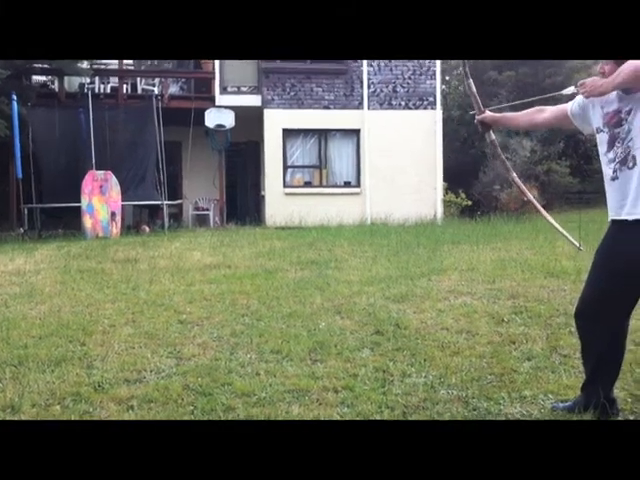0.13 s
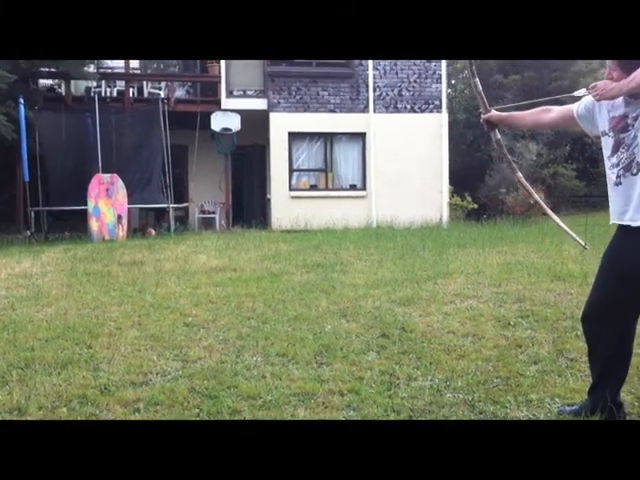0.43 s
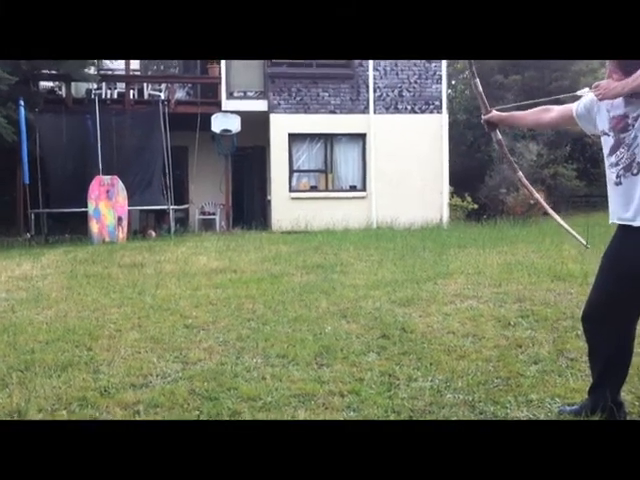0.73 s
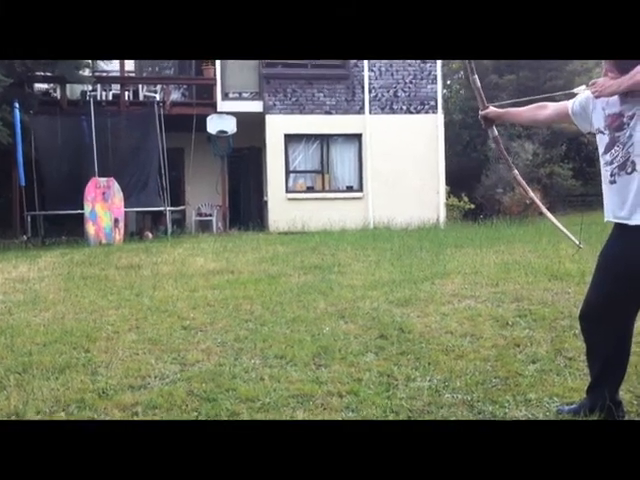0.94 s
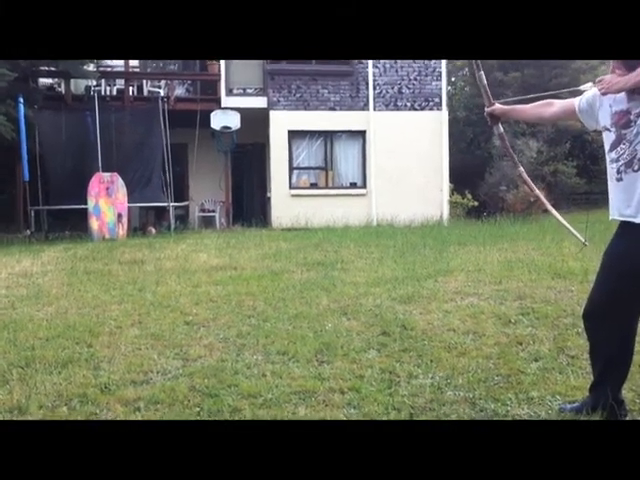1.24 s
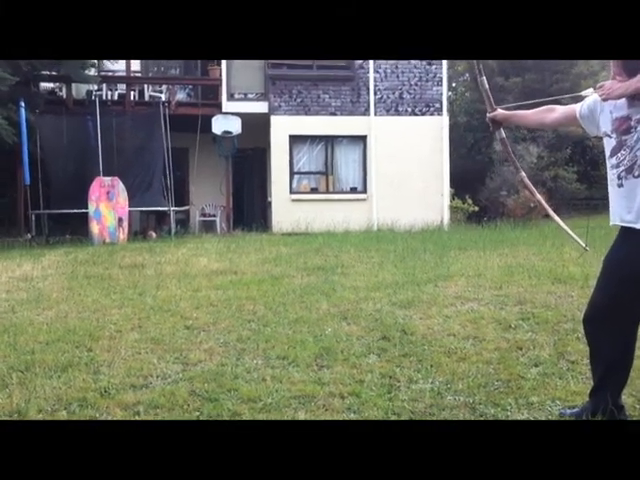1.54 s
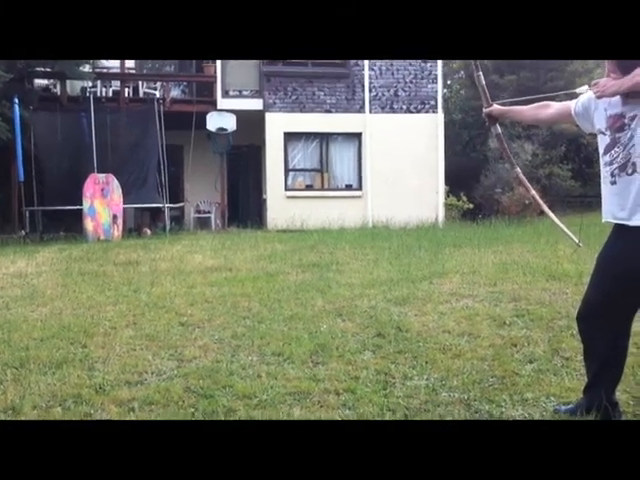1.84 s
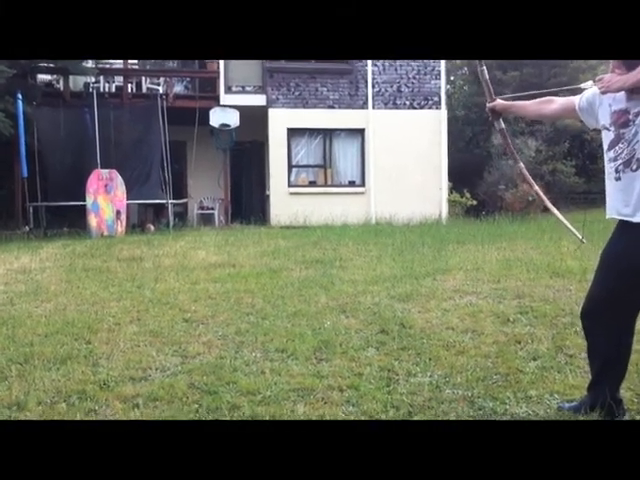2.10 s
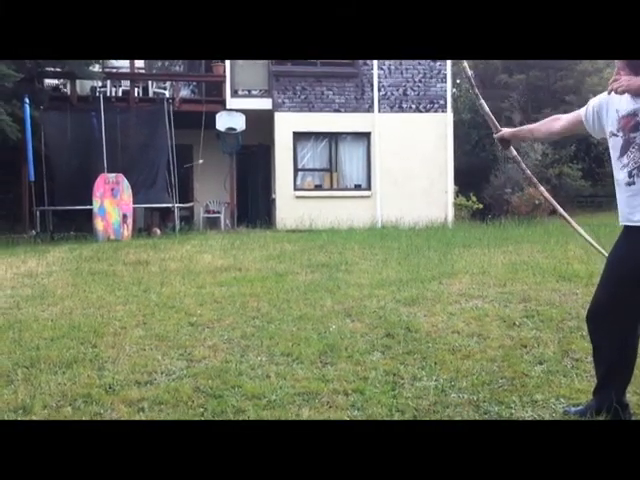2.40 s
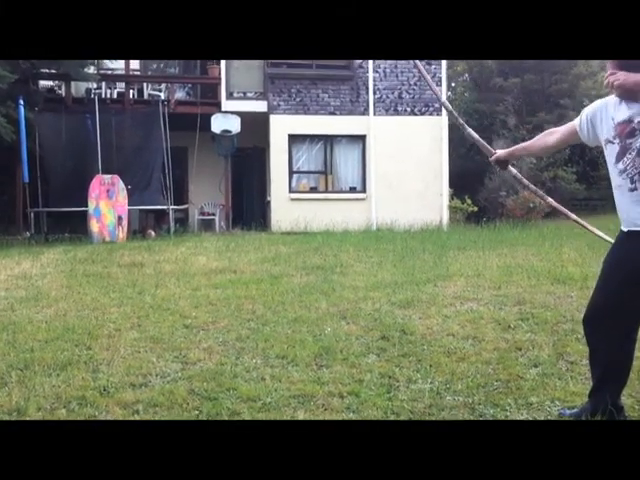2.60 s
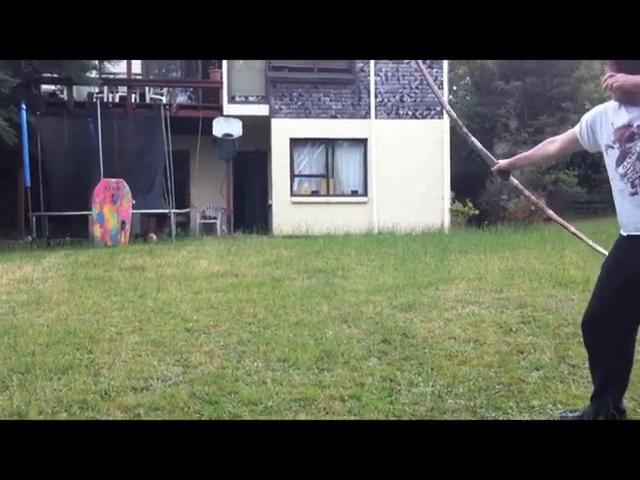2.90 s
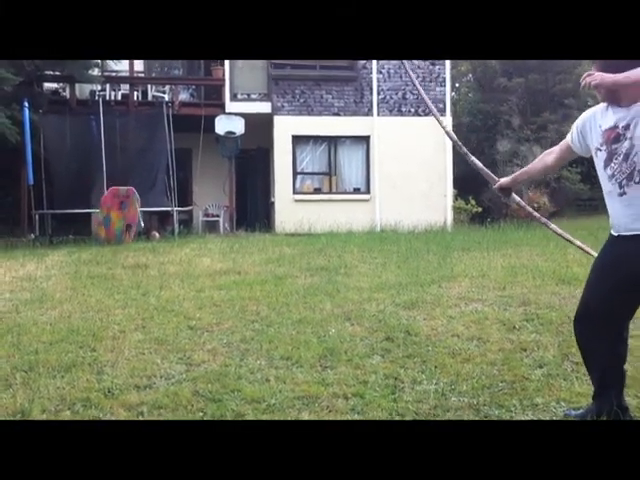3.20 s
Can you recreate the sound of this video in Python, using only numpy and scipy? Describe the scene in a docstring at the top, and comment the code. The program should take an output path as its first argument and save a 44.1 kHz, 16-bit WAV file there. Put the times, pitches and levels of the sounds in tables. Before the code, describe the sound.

A bow shot in a grassy backyard. For the first 2.3 s only small birds chirp and twitter near and far over faint distant traffic, breeze and hiss. At 2.3 s the wooden bow snaps and the arrow clatters dryly past it; at 2.62 s it hits a standing shield with a crack, hollow thump and tiny rattle. Walls scatter brief echoes; light wind and chirps continue to 3.35 s.

```python
"""Small birds chirp near and far over distant traffic, wind in trees and hiss, all shaped or banded noise;
the birds are gliding sines, partly scattered by the trees. A wooden longbow is then loosed on a lawn: the
arrow clatters past the stave as rasps and decaying modes, then thumps into a standing shield some ten metres
off, with cracks, ringing face modes and a brief panel boom. House walls and a fence scatter both back."""
import sys
import numpy as np
from scipy import signal
from scipy.fft import rfft, irfft
from scipy.io import wavfile
from scipy.ndimage import uniform_filter1d

SR = 44100
rng = np.random.default_rng(int(sys.argv[2]) if len(sys.argv) > 2 else 0)


def unload_wav(signal):
    """Save mono or channel-first audio to the path in sys.argv[1] as 16-bit WAV at rate SR, clipped to [-1, 1]."""
    wavfile.write(
        sys.argv[1],
        SR,
        np.round(np.clip(np.atleast_2d(signal).T, -1, 1) * 32767).astype(np.int16),
    )


def ratio(d):
    """dB to gain"""
    e = np.asarray(d, float) / 20
    return 10 ** e


N = 147735  # samples


def add(out, start_s, sound):
    """Superposition: pressures sum, here from start_s on."""
    i = int(start_s * SR)
    out[i:i + len(sound)] += sound[:N - i]


def band(x, center_hz, octaves):
    """Band-pass filtering: a Gaussian weight on a log-frequency axis."""
    f = np.fft.rfftfreq(len(x), 1 / SR) + 1
    weight = np.exp(-.5 * (np.log2(f / center_hz) / octaves) ** 2)
    return irfft(rfft(x) * weight, len(x))


def walk(rate_hz):
    """Random modulation: held random values, smoothed twice, with a spread near 1."""
    hold = int(SR / rate_hz)
    steps = np.repeat(rng.standard_normal(N // hold + 1), hold)
    return 1.3 * uniform_filter1d(uniform_filter1d(steps, hold), hold)[:N]


def contour(table):
    """Amplitude envelope: the table's level in dB, interpolated over time."""
    return np.interp(np.arange(N) / SR, *np.array(table).T)


def decay(t, t60_s):
    """Exponential damping: a fall of 60 dB in t60_s."""
    return np.exp(-np.log(1000) * t / t60_s)


def convolve(x, response):
    """Linear response: x heard through an impulse response."""
    return signal.fftconvolve(x, response)[:N]


# spectrum of traffic, leaves and hiss; only its shape counts, the sum is levelled afterwards
# columns: frequency_hz, relative_level_db (per Hz)
AIR_SPECTRUM = [(20, -22), (50, -16), (90, -10.5), (140, -1), (190, -0.5), (300, -1.5), (490, -4),
                (680, -9), (1100, -8.5), (1500, -13), (2200, -14.5), (2900, -19), (6000, -22.5),
                (11000, -25.5), (15700, -23), (16300, -59)]


def air():
    """Broadband noise: shaped noise in bands that swell together and flicker alone, steadier in the treble."""
    level_db, gust_db, flicker_db = -58, .4, 0.7  # the last two shrink above 1500 Hz
    f = np.fft.rfftfreq(N, 1 / SR) + 1
    hz, db = np.array(AIR_SPECTRUM).T
    spectrum = ratio(np.interp(np.log(f), np.log(hz), db))
    noise = irfft(rfft(rng.standard_normal(N)) * spectrum, N)
    gust = walk(1.66)
    out = np.zeros(N)
    for center_hz in 20 * 2 ** np.arange(0, 10.5, .5):
        depth = min(1, 1500 / center_hz) ** .5
        swing_db = depth * (gust_db * gust + flicker_db * walk(8.7))
        out += ratio(swing_db) * band(noise, center_hz, 0.9)
    return ratio(level_db) * out / out.std()


# wind buffeting the microphone, before its random wavering
# columns: time_s, level_db
BUFFET_LEVEL = [(0, -83), (2.5, -72), (2.7, -58), (2.95, -65), (3.08, -58.5), (3.2, -67), (3.35, -80)]


def buffet():
    """Turbulent pressure: a low band of noise whose level follows the wind and wavers."""
    wind = band(rng.standard_normal(N), 69.6, 1.0)
    wind_db = contour(BUFFET_LEVEL) + 1.2 * walk(14)
    return ratio(wind_db) * wind / wind.std()


# tyre roar of a car passing far off
# columns: time_s, level_db
CAR_LEVEL = [(0, -73), (1.4, -121), (1.6, -65), (2.1, -65), (2.6, -75), (3.35, -66)]


def car():
    """Rolling noise: a broad band of noise whose level falls and rises."""
    roar = band(rng.standard_normal(N), 1110, 0.57)
    return ratio(contour(CAR_LEVEL)) * roar / roar.std()


def chirp(length_s, start_hz, end_hz):
    """Frequency modulation: a sine of gliding pitch under a rounded envelope."""
    u = np.linspace(0, 1, max(int(length_s * SR), 8))
    pitch_hz = start_hz + (end_hz - start_hz) * u
    return np.sin(np.pi * u) ** 0.42 * np.sin(2 * np.pi * np.cumsum(pitch_hz) / SR)


# clear notes of near birds
# columns: start_s, length_s, start_hz, end_hz, level_db (direct sound)
NEAR_NOTES = [(.015, 0.022, 2840, 2850, -68), (.06, 0.035, 2850, 2870, -68), (.165, 0.011, 3800, 3750, -60),
              (0.172, 0.031, 4360, 4300, -66), (.195, 0.016, 3640, 3280, -61),
              (0.213, 0.021, 3890, 3490, -58.5), (0.209, 0.022, 2970, 2900, -70),
              (0.256, 0.032, 2000, 2040, -62.5), (0.265, .02, 2930, 2970, -66),
              (.31, .08, 2900, 2820, -65.5), (0.323, 0.045, 2000, 2000, -65),
              (0.348, 0.013, 3380, 3370, -59.5), (0.6, .07, 3910, 3900, -69.5),
              (0.68, 0.06, 4170, 3920, -59), (.715, 0.027, 5000, 3540, -56.5),
              (0.749, 0.022, 4300, 3860, -56.5), (1.08, 0.031, 4600, 4700, -67),
              (1.124, 0.009, 3400, 3600, -59), (1.138, .012, 3270, 3150, -61),
              (1.164, 0.034, 4600, 4600, -71), (1.172, 0.0088, 4000, 3700, -61.5),
              (1.229, 0.013, 3800, 2970, -60), (1.275, .014, 3070, 3050, -63),
              (1.733, 0.014, 3400, 4200, -61), (1.764, 0.016, 4155, 3350, -47.5),
              (1.797, .02, 3660, 3440, -52), (1.808, 0.023, 3280, 2900, -61), (1.759, .03, 4430, 4500, -66),
              (1.892, .025, 3640, 3320, -62), (2.281, 0.023, 4180, 3800, -58),
              (2.554, 0.026, 2600, 2600, -64.5), (2.58, 0.03, 4700, 4550, -65),
              (2.745, 0.024, 4130, 4210, -57), (2.766, 0.02, 4290, 3470, -51.5),
              (2.806, 0.0165, 3430, 4000, -51.5), (2.818, 0.0192, 3950, 3480, -54.5),
              (3.247, 0.0066, 4080, 3530, -58.5), (3.299, 0.0085, 3800, 3540, -57),
              (3.312, 0.013, 2800, 2780, -62)]
# fast twitter of farther birds
# columns: start_s, length_s, low_hz, high_hz, level_db (before the spread of the tweets and the path)
FAR_TWITTER = [(0.158, 0.086, 2676, 4300, -61.5), (0.296, 0.092, 2430, 5160, -63.5),
               (0.543, 0.21, 3510, 4500, -64), (0.707, 0.096, 3360, 5050, -57),
               (0.75, 0.07, 2720, 3260, -63), (1.081, 0.25, 2650, 4290, -68.5),
               (1.347, 0.17, 3310, 4490, -70.5), (1.545, 0.12, 1570, 2390, -67),
               (1.819, 0.1, 2970, 4560, -62), (1.971, 0.056, 4150, 4820, -57),
               (2.003, 0.12, 2600, 3800, -65.5), (2.83, 0.069, 2980, 4300, -65),
               (3.042, 0.062, 3255, 5030, -58), (3.149, .2, 2660, 4460, -69)]
# one far bird's falling whistle
# columns: start_s, length_s, start_hz, end_hz, level_db (before the path)
FAR_WHISTLE = [(.99, .09, 7450, 5600, -59)]


def birds():
    """Direct and scattered sound: near notes come mostly direct, far twitter and whistle mostly off the trees."""
    tweets_per_s, tweet_s, glide, spread_db = 600, 0.011, 0.16, 5  # glide: largest share of the pitch
    near_to_trees_db, far_direct_db, trees_t60_s = -7.5, -10, 0.43
    near, far = np.zeros(N), np.zeros(N)
    for start_s, length_s, start_hz, end_hz, db in NEAR_NOTES:
        add(near, start_s, ratio(db) * chirp(length_s, start_hz, end_hz))
    for start_s, length_s, start_hz, end_hz, db in FAR_WHISTLE:
        add(far, start_s, ratio(db) * chirp(length_s, start_hz, end_hz))
    for start_s, length_s, low_hz, high_hz, db in FAR_TWITTER:
        for place, height, bend, loudness in rng.random((int(length_s * tweets_per_s), 4)):
            hz = low_hz + (high_hz - low_hz) * height
            tweet = chirp(tweet_s, hz, hz * (1 + glide * (2 * bend - 1)))
            swell = np.sin(np.pi * place) ** .5  # tweets are loudest mid-swarm
            level = ratio(db + spread_db * (loudness - 1.5))
            add(far, start_s + length_s * place, level * swell * tweet)
    t = np.arange(SR // 3) / SR
    trees = rng.standard_normal(len(t)) * decay(t, trees_t60_s)
    trees = trees / np.sqrt(np.sum(trees ** 2))  # unit energy
    scattered = convolve(ratio(near_to_trees_db) * near + far, trees)
    return near + ratio(far_direct_db) * far + scattered


def ring(modes, length_s, contact_s, detune=0, flip=-1):
    """Modal superposition: decaying sines swell over the contact time; mode k is weighted by flip ** k."""
    t = np.arange(int(length_s * SR)) / SR
    tune = 1 + detune * rng.standard_normal(len(modes))
    out = np.zeros(len(t))
    for k, (hz, db, t60_s) in enumerate(modes):
        out += flip ** k * ratio(db) * np.sin(2 * np.pi * hz * tune[k] * t) * decay(t, t60_s)
    return (1 - np.exp(-t / contact_s)) * out


def burst(decay_s):
    """Impulsive noise: a short splinter of white noise that falls by 1/e in decay_s."""
    return rng.standard_normal(600) * np.exp(-np.arange(600) / SR / decay_s)


# scatter from house walls and fence, per band
# columns: center_hz, after_bow_db, after_shield_db (both relative to the impact), t60_s
YARD_SCATTER = [(149, -47, -33, 0.56), (326, -46, -22.5, 0.21), (950, -49, -39, 1),
                (1845, -31, -28.5, 0.49), (3800, -33, -41.5, 0.6), (6060, -34.5, -43, 0.39),
                (9800, -41.5, -43, 0.46), (15000, -50, -50, .25)]


def yard(column):
    """Diffuse reflection: makes lumpy noise echoes that swell after a gap, each band with its own decay."""
    delay_s, rise_s = 0.0013, 0.004
    t = np.arange(SR // 2) / SR
    rise = np.clip((t - delay_s) / rise_s, 0, 1)
    lumps = ratio(2.5 * walk(200)[:len(t)])  # dB, new values per second

    def echo():
        """Random scattering: a fresh noise under the same lumps."""
        noise = lumps * rng.standard_normal(len(t))
        out = np.zeros(len(t))
        for row in YARD_SCATTER:
            x = band(noise, row[0], 0.33)
            out += ratio(row[column]) * x / x.std() * decay(t, row[3])
        return rise * out
    return echo


# arrow knocking on string and stave
# columns: start_s, level_db, low_modes_db (relative to the high modes)
KNOCKS = [(2.3025, -44, 6), (2.3060, -21, -6), (2.3075, -41, 5), (2.3090, -34.5, -9), (2.3178, -20.5, 3),
          (2.3195, -32, -2), (2.3215, -28, 8), (2.3238, -23, -8.5), (2.3255, -22, -1), (2.3270, -25, 2.5),
          (2.3295, -35.5, 14), (2.3335, -32.5, 6.5), (2.3385, -49, 4), (2.387, -47, 10), (2.3990, -47, 10)]
# modes of shaft and stave, before random detuning and the swell of the contact
# columns: pitch_hz, level_db (relative to the knock), t60_s
SHAFT_MODES = [(295, -25, 0.032), (409, -22, 0.085), (874, -25.5, 0.06), (1120, -21.5, 0.053),
               (1717, -10, 0.021), (2076, -9.5, 0.04), (2600, -7.5, 0.016), (3150, -13, 0.056),
               (3700, 2.5, 0.019), (4300, 4, .01), (5580, -4, 0.012), (6300, -11.5, 0.017),
               (8200, -14.5, 0.0085), (9050, -13.5, 0.013), (12000, -14, 0.014), (13100, -27, .01)]


def bow():
    """Impact excitation: each knock rings slightly detuned modes, adds a rasp and wakes the yard."""
    split_hz, ring_s, contact_s, detune = 2900, .12, 0.00066, .025  # detune: spread as a share of pitch
    rasp_db, rasp_s = -10, 0.00073
    low = [mode for mode in SHAFT_MODES if mode[0] < split_hz]
    high = [mode for mode in SHAFT_MODES if mode[0] >= split_hz]
    out, echo = np.zeros(N), yard(column=1)
    for start_s, db, low_db in KNOCKS:
        high_ring = ring(high, ring_s, contact_s, detune)
        low_ring = ring(low, ring_s, contact_s, detune)
        add(out, start_s, ratio(db) * (high_ring + ratio(low_db) * low_ring))
        add(out, start_s, ratio(db + rasp_db) * burst(rasp_s))
        add(out, start_s, ratio(db) * echo())
    return out


# arrow in the shield, then the shield rattling on its prop
# columns: start_s, level_db
SHIELD_BLOWS = [(2.6205, -24), (2.62145, -15), (2.6240, -27), (2.6375, -31), (2.6420, -32), (2.6480, -32),
                (2.6565, -28), (2.6590, -32), (2.6630, -33), (2.6750, -31), (2.6810, -35), (2.6950, -37)]
# pushes that bend the whole panel
# columns: start_s, level_db
PANEL_PUSHES = [(2.6223, -20.5), (2.638, -47), (2.655, -34), (2.6750, -33)]
# face of the shield under the point, before the contact swell and the slight taper over the modes
# columns: pitch_hz, level_db (relative to the blow), t60_s
FACE_MODES = [(840, -11, .014), (940, -5, .016), (1150, -7, .012), (1550, 3, .009), (1950, 8, .007),
              (2800, -6, .014), (3740, -16, .01), (4600, -16, .01), (5600, -12, .007), (7300, -9, .005),
              (10200, -10, .005), (11600, -9, .005), (15000, -8, .005)]
# whole panel of the shield, before the contact swell and the taper over the modes
# columns: pitch_hz, level_db (relative to the push), t60_s
PANEL_MODES = [(117, -19, 0.11), (159.6, -4.5, .16), (195.3, 2.5, 0.069), (217, -3.5, 0.17),
               (270, 2, 0.081), (331.6, -4, 0.17), (358, -8, .1)]


def shield():
    """Plate vibration: blows ring the face, crack and wake the yard; slower pushes make the panel boom."""
    crack_db, crack_steep, crack_s = -4.5, 1.39, .0022  # steep: dB of crack per dB of blow
    face = ring(FACE_MODES, .06, .0008, flip=0.99)
    panel = ring(PANEL_MODES, .3, 0.0039, flip=0.93)
    out, echo = np.zeros(N), yard(column=2)
    for start_s, db in SHIELD_BLOWS:
        add(out, start_s, -ratio(db) * face)
        add(out, start_s, ratio(crack_steep * db + crack_db) * burst(crack_s))
        add(out, start_s, ratio(db) * echo())
    for start_s, db in PANEL_PUSHES:
        add(out, start_s, -ratio(db) * panel)
    return out


def scene():
    """Superposition of sources: air, wind, car and birds, then bow and shield, in one channel."""
    return (air() + buffet() + car() + birds() + bow() + shield())[None]


def low_pass(x):
    """Removes everything above the highest recorded frequency."""
    return signal.sosfilt(signal.butter(12, 16670, fs=SR, output="sos"), x)


def record(dry):
    """Band limiting: a small microphone loses the deep bass and the very top."""
    low_cut = signal.butter(2, 108, "high", fs=SR, output="sos")  # Hz
    top_cut = signal.ellip(8, .2, 60, 16300, fs=SR, output="sos")  # ripple dB, rejection dB, Hz
    mic = signal.sosfilt(top_cut, signal.sosfilt(low_cut, dry))
    return low_pass(mic)


dry = scene()
out = record(dry)
unload_wav(out)
```